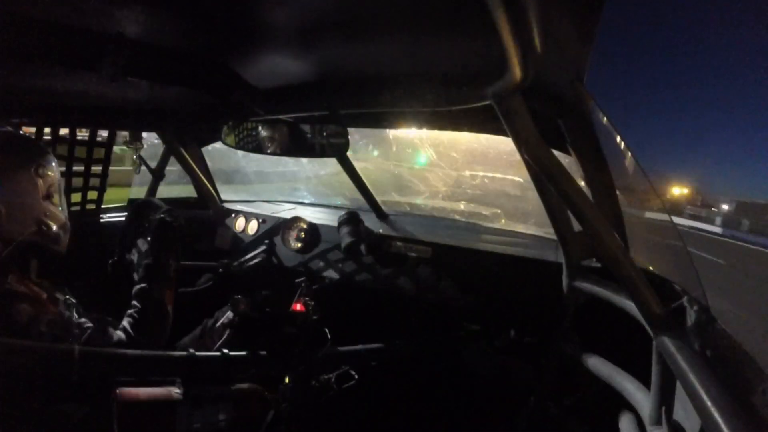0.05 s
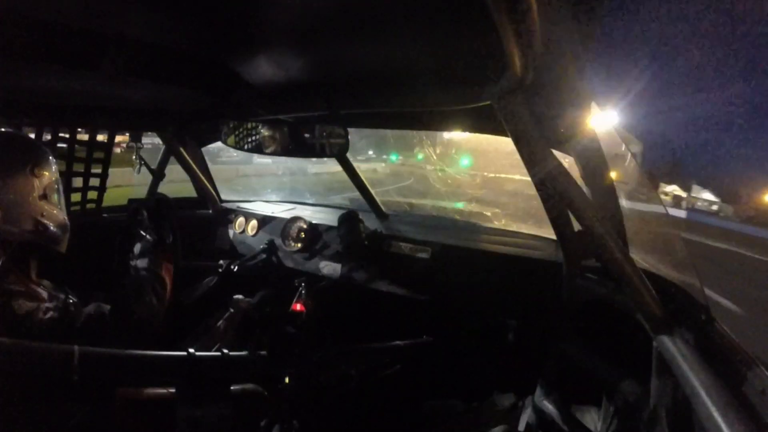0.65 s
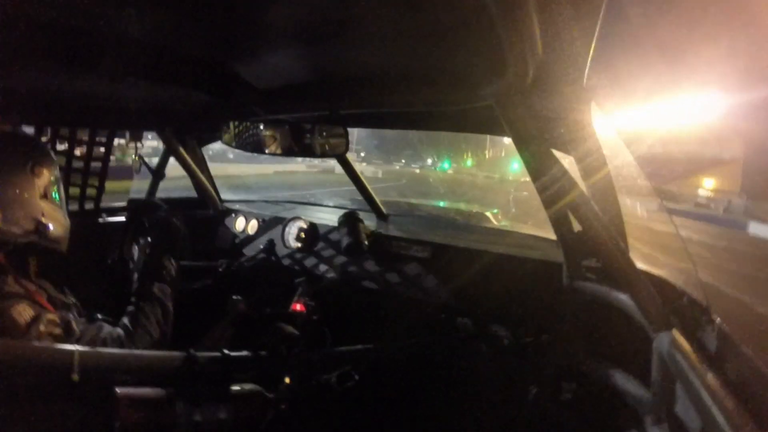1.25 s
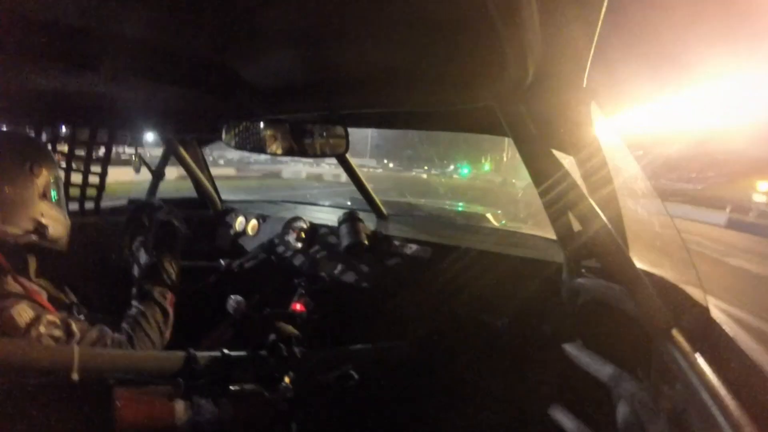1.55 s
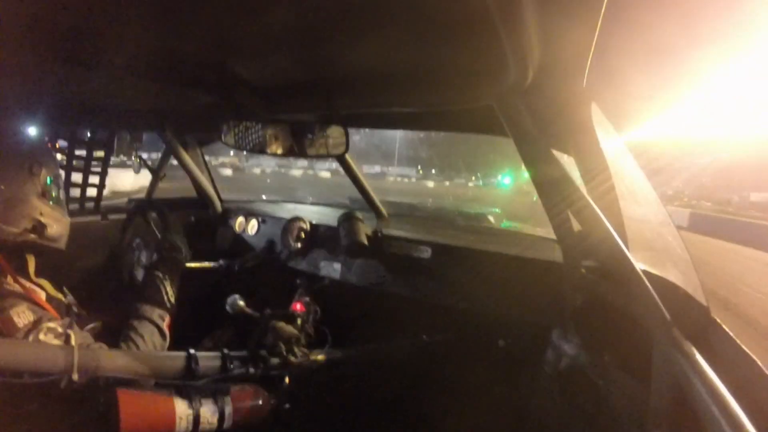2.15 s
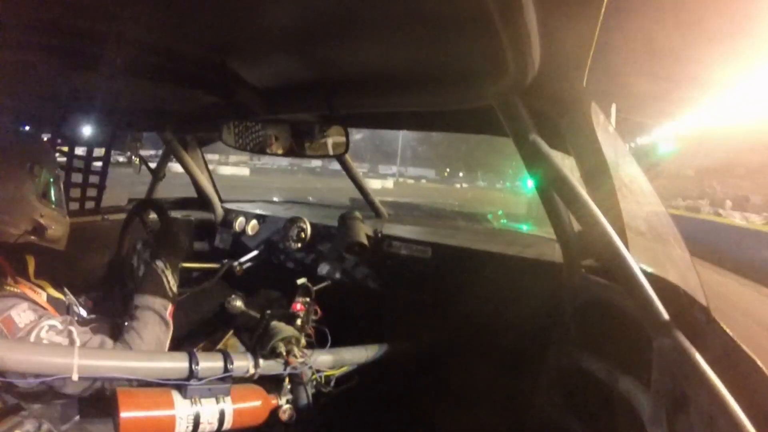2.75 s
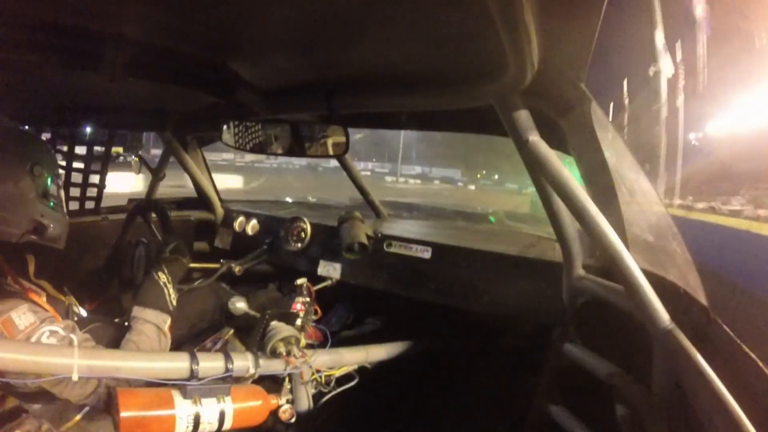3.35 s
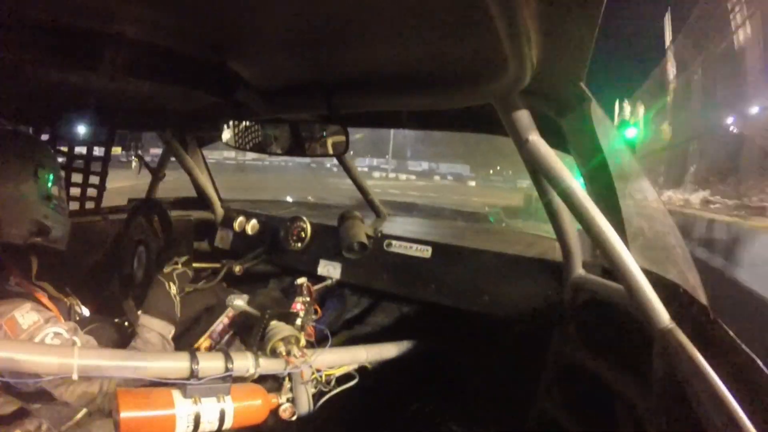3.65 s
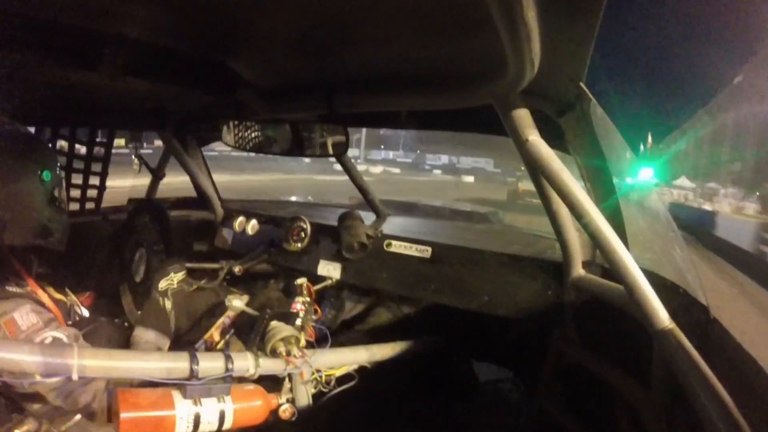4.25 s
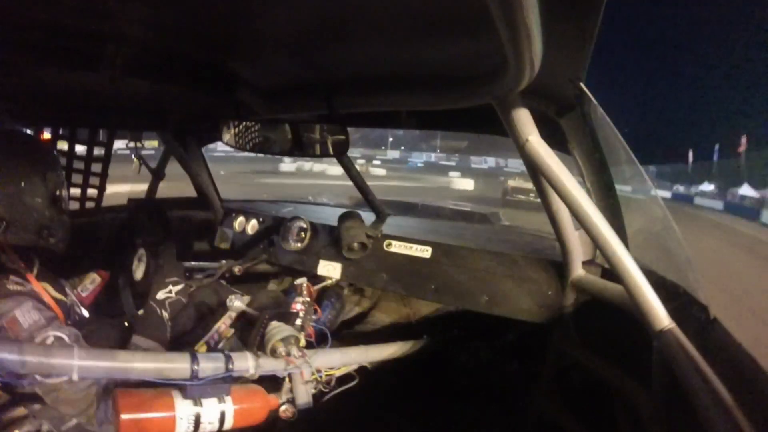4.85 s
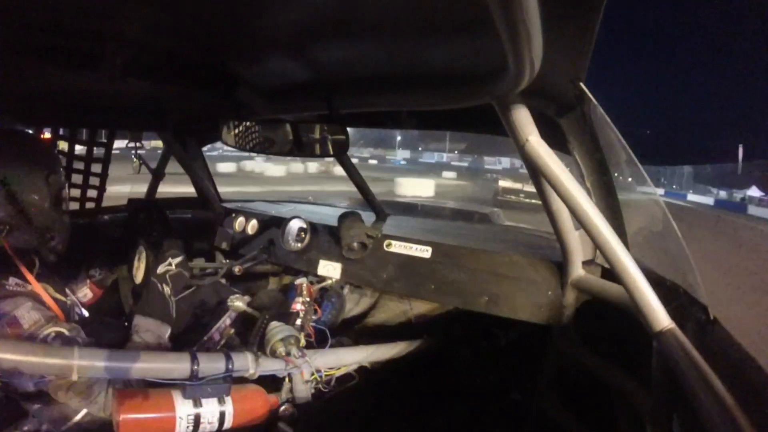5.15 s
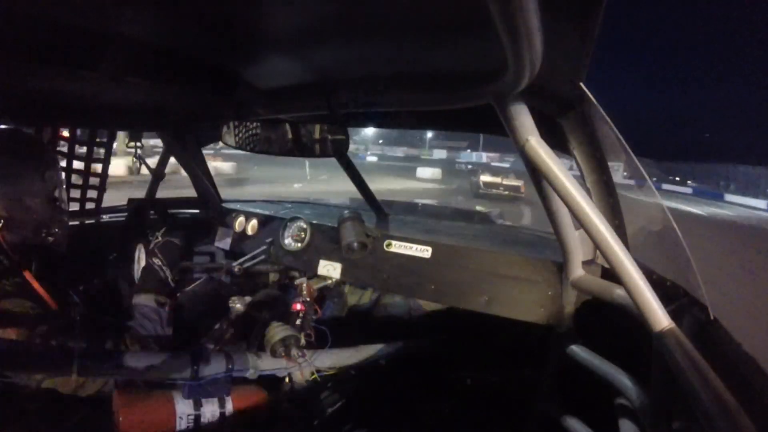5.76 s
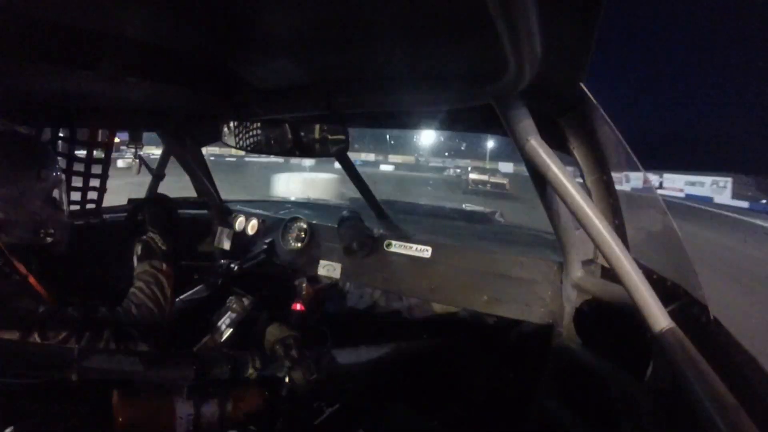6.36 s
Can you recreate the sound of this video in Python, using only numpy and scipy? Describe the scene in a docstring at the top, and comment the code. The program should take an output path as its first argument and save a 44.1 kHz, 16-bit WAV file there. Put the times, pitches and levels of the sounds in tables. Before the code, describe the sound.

Inside a racing car, a loud booming engine pulls along a straight, then eases off while the chassis rumbles and tyres briefly squeal.

```python
"""Bare metal cockpit of a V8 stock car: it pulls along a straight, lifts at 3.6 s and slows into a bend.
Engine orders and gritty road roar pass the shell's resonances; at high revs the second order locks
onto the cabin's air resonance and booms. Fittings ring faintly; a loose panel buzzes at the start.
In the bend the chassis rumble and air drone grow, and the tyres scrub and chirp."""
import sys
import numpy as np
from scipy import signal
from scipy.fft import rfft, irfft, next_fast_len
from scipy.io import wavfile
from scipy.ndimage import uniform_filter1d

SR = 44100
rng = np.random.default_rng(int(sys.argv[2]) if len(sys.argv) > 2 else 0)


def master(y):
    """Save y as 16-bit WAV."""
    cut = np.clip(np.atleast_2d(y).T, -1, 1)
    pcm = np.round(cut * 32767)  # scale
    wavfile.write(sys.argv[1], SR, pcm.astype(np.int16))


N = 291501
HOP = 256
TIME = np.arange(N) / SR
FRAMES = np.arange(N // HOP + 6) * HOP / SR
USUAL_DB = -21  # reference din level

# strong low engine orders: order, pull_db, coast_db
STRONG_ORDERS = [(1, 2.5, 0.5), (2, 2.5, -2), (3, 2, -3), (4, -1, 0.5), (5, -5, -2), (6, -2, 3),
                 (7, -4, -3.5), (8, 8, 4)]


def amp(db):
    """dB to gain."""
    return 10 ** (np.asarray(db) / 20)


def unit(x):
    """Scale to rms 1."""
    return x / np.sqrt(np.mean(x ** 2) + 1e-20)


def ramp(t, start_s, rise_s):
    """Linear rise, 0-1."""
    return np.clip((t - start_s) / rise_s, 0, 1)


def above(x, threshold, width):
    """Soft switch, 0-1."""
    return .5 + .5 * np.tanh((x - threshold) / width / 2)


def log_curve(points, hz):
    """Interpolate on a log-frequency axis."""
    point_hz, value = np.transpose(points)
    return np.interp(np.log(hz + 1), np.log(point_hz + 1), value)


def humps_db(table, hz):
    """Sum of bell-shaped resonances."""
    return sum(db * np.exp(-(2 * (hz - centre) / width) ** 2) for centre, width, db in table)


def spread(x):
    """Frame rate to sample rate."""
    return np.interp(TIME, FRAMES, x)


def wander(rate_hz):
    """Smooth random drift, rms 1, per frame."""
    size = 2 * len(FRAMES)
    lowpass = np.exp(-(np.fft.rfftfreq(size, HOP / SR) / rate_hz) ** 2)
    return unit(irfft(rfft(rng.standard_normal(size)) * lowpass)[:len(FRAMES)])


def noise(gain):
    """Noise with spectrum gain(hz), rms 1."""
    size = next_fast_len(N, real=True)
    spectrum = rfft(rng.standard_normal(size)) * gain(np.fft.rfftfreq(size, 1 / SR))
    return unit(irfft(spectrum, size)[:N])


def steadied(x, window_s):
    """Remove slow swells, keep fast flutter."""
    return x / np.sqrt(uniform_filter1d(x ** 2, max(int(window_s * SR), 64)) + 1e-6)


def rubbed(centre_hz, width_hz):
    """One resonance rung by random rubbing."""
    return noise(lambda hz: 1 / (1 + ((hz - centre_hz) / width_hz) ** 4))


def revs_hz(t):
    """Four-stroke cycle rate; eight firings a cycle."""
    # engine speed: time_s, cycle_hz
    speed = [(0.0, 36.17), (0.72, 38.59), (1.19, 42.12), (1.43, 42.1), (1.85, 45.2), (2.1, 45.8),
             (2.32, 48.67), (2.41, 47.35), (2.96, 49.51), (3.02, 50.32), (3.6, 52.7), (3.8, 47.59),
             (4.4, 44.67), (4.85, 41.1), (5.29, 39.02), (5.43, 38.37), (5.74, 37.3), (6.05, 36.84),
             (6.4, 34.41), (6.61, 34.33)]
    return np.interp(t, *np.transpose(speed))


def throttle(t):
    """1 on the straight, 0 after the lift."""
    return 1 - ramp(t, start_s=3.59, rise_s=0.079)


def by_load(pull, coast):
    """Blend on- and off-throttle values, per frame."""
    return coast + (pull - coast) * throttle(FRAMES)


def bend(t):
    """Cornering load, 0-1: builds from turn-in, eases at the exit."""
    return ramp(t, start_s=4.13, rise_s=1.66) * (1 - ramp(t, start_s=6.48, rise_s=.5))


def dips_db(t, fall_s=0.0055):
    """The level dips briefly."""
    # level dips: start_s, depth_db, recovery_s
    dips = [(0.219, 3, .2), (2.09, 5.5, 0.13), (2.57, 4.5, 0.056), (6.089, 14, 0.069)]
    return -sum(db * ramp(t, start_s, fall_s) * np.exp(-np.maximum(t - start_s, 0) / recovery_s)
                for start_s, db, recovery_s in dips)


def din_db(t, load_db=6):
    """Level of engine and road din, higher on the throttle."""
    # din before throttle and dips: time_s, level_db
    base = [(0.0, -30), (0.12, -27), (0.72, -29.0), (1.1, -25), (1.18, -26.5), (1.28, -24), (1.65, -29.5),
            (2.18, -34.5), (2.45, -31.5), (3.37, -28.5), (3.6, -31), (4.1, -30), (4.4, -23.5),
            (4.88, -18.5), (5.2, -24.5), (5.4, -20.5), (5.56, -24), (5.7, -19), (6.04, -24), (6.34, -22),
            (6.61, -29)]
    return np.interp(t, *np.transpose(base)) + load_db * throttle(t) + dips_db(t)


def shell(hz):
    """Gain into the cockpit: falling slope plus panel resonances."""
    # shell transmission: freq_hz, gain_db
    wall = [(60, -42), (110, 6), (140, 9), (250, -7.5), (400, -7.5), (700, -8), (1050, -14.5), (1700, -13),
            (2080, -21.5), (3000, -19.5), (3700, -20), (4050, -33), (6200, -30.5), (8000, -39.5),
            (13000, -47), (14000, -58.5)]
    # cabin and panel resonances: centre_hz, width_hz, gain_db
    panels = [(309.4, 44, 14), (470, 264, 7.5), (836.5, 91, 13), (927, 95, 10), (1257, 108, 9.5),
              (1438, 64, 12), (1595, 166, 10.5), (1820, 180, 8), (2459, 355, 9), (2776, 134, 7),
              (4524, 710, 7), (5640, 460, 4), (10000, 82, -1)]
    return amp(log_curve(wall, hz) + humps_db(panels, hz))


def din_spectrum(hz, rasp_db=-12, hiss_db=-22.5, rasp_load_db=1.5, mid_revs_hz=43.9, db_per_hz=.14):
    """Din amplitude per root Hz, frames x frequencies; brighter with revs and load."""
    t = FRAMES[:, None]
    bite_db = .12 * throttle(t) * (din_db(t) - USUAL_DB)  # loaded surges turn raspier
    bright_db = db_per_hz * (revs_hz(t) - mid_revs_hz) + bite_db
    body, edge, top = (np.linalg.norm(shell(np.arange(*band_hz)))
                       for band_hz in [(380, 2000), (2000, 4000), (4000, 12000)])
    rasp = amp(rasp_db + rasp_load_db * throttle(t) + bright_db) * body / edge
    hiss = amp(hiss_db + bright_db) * body / top
    upper = log_curve([(1700, 0), (2300, 1)], hz)
    treble = log_curve([(3500, 0), (4500, 1)], hz)
    return amp(din_db(t)) * shell(hz) / body * rasp ** (upper - treble) * hiss ** treble


def pitched_share(hz, sink_hz=36.54, sink_width_hz=0.45):
    """Power share of the orders; they blur into rasp high up and sink into road noise at low revs."""
    fade = log_curve([(300, 1.0), (800, 0.69), (1600, 0.72), (2400, 0.58), (3500, 0.085), (4200, 0.14)],
                     hz)
    share = by_load(pull=0.86, coast=0.72 * above(revs_hz(FRAMES), sink_hz, sink_width_hz))
    return np.clip(share[:, None] * fade, 0, .95)


def crank(jitter=0.00068):
    """Cycle angle in rad; uneven burning makes the speed tremble."""
    tremble = 1 + jitter * spread(wander(rate_hz=22.2))
    return 2 * np.pi * np.cumsum(revs_hz(TIME) * tremble) / SR


def growl_db(hz):
    """The engine drives some resonances harder than others; frames x orders."""
    # driven resonances: centre_hz, width_hz, pull_db, coast_db
    driven = [(352, 35, 4.5, -13), (458, 26, 2, 0.5), (530, 110, -1, -0.5), (686, 270, 0, 0),
              (830, 25, 2, -0.5), (1226, 55, 3, 7.5), (1550, 930, -2, 1.5), (2410, 90, 4, 5)]
    return humps_db([(centre, width, by_load(pull, coast)[:, None])
                     for centre, width, pull, coast in driven], hz)


def exhaust(angle, flutter=0.32, smear_rad=0.21):
    """A comb of fluttering upper orders slides through the shell's resonances."""
    # uneven cylinders favour some order families: pull_db, coast_db
    odd, even, fourth, firing = (2, -5.5), (-1.5, -0.5), (1.5, 0), (3, 0.5)
    cycle_hz = revs_hz(FRAMES)[:, None]
    orders = np.arange(len(STRONG_ORDERS) + 1, 68)
    hz = cycle_hz * orders
    gains = din_spectrum(hz) * np.sqrt(2 * cycle_hz * pitched_share(hz)) * amp(growl_db(hz))
    out = np.zeros(N)
    for order, gain in zip(orders, gains.T):
        family = odd if order % 2 else even if order % 4 else fourth if order % 8 else firing
        gain = gain * amp(by_load(*family)) * (1 + flutter * wander(rate_hz=4.9))
        phase = 2 * np.pi * rng.random() + smear_rad * wander(rate_hz=5.5)
        out += spread(gain) * np.cos(order * angle + spread(phase))
    return out


def roar(angle, patchy_db=1.39, lope=0.081, bank=0.066, puff=0.047):
    """Gas and road noise in the shell, pulsing with the cycle, crank turn and firings."""
    hz = np.fft.rfftfreq(4 * HOP, 1 / SR)
    window = dict(nperseg=4 * HOP, noverlap=3 * HOP)
    white = signal.stft(rng.standard_normal(N + 8 * HOP), **window)[2][:, :len(FRAMES)].T
    patches = uniform_filter1d(rng.standard_normal(white.shape), size=9, axis=0)
    patches = unit(uniform_filter1d(patches, size=14, axis=1))
    gain = din_spectrum(hz) * np.sqrt((1 - pitched_share(hz)) * SR / 2) * amp(patchy_db * patches)
    wash = signal.istft((white * gain).T, **window)[1][:N]
    return wash * unit(1 + lope * np.cos(angle) + bank * np.cos(2 * angle) + puff * np.cos(8 * angle))


def lock(lock_hz=42.23, coast_shift_hz=0.39, width_hz=0.24, build_s=0.32):
    """Lock of order 2 onto the cabin air, 0-1 per frame; builds while revs stay high."""
    high = above(revs_hz(FRAMES), lock_hz + coast_shift_hz * (1 - throttle(FRAMES)), width_hz)
    held_s = np.cumsum(high) * HOP / SR
    return high * (1 - np.exp(-held_s / build_s))


def low_orders(angle, base_db=-41.5, flutter=0.16, boom_db=-11, boom_load_db=-0.5, boom_flutter=0.073):
    """Near-pure orders sweep the cabin modes: order 2 booms, order 8 is the firing note."""
    # cabin air resonances: centre_hz, width_hz, gain_db
    modes = [(49.7, 3.5, 14), (73.6, 28, 16.5), (103.75, 25.3, 29.5), (121.6, 7.5, 16), (159.3, 41.3, 14),
             (217, 24, 11.5), (251.4, 8.1, 8.5), (273.3, 6.8, 10), (299.9, 28.8, 14.5), (328.4, 32, 12.5),
             (385.6, 25, 6.5), (418.5, 24, 7)]
    swell_db = 0.58 * (din_db(FRAMES) - USUAL_DB)
    out = np.zeros(N)
    for order, pull_db, coast_db in STRONG_ORDERS:
        mode_db = humps_db(modes, order * revs_hz(FRAMES))
        gain = amp(base_db + mode_db + by_load(pull_db, coast_db) + swell_db)
        gain *= 1 + flutter * wander(rate_hz=7.8)
        if order == 2:
            boom = amp(boom_db + boom_load_db * throttle(FRAMES))
            boom *= 1 + boom_flutter * wander(rate_hz=27)
            gain += lock() * (boom - gain)
        out += spread(gain) * np.cos(order * angle + 2 * np.pi * rng.random())
    return np.sqrt(2) * out


def chassis_rumble(relative_db=-11.5, bend_db=12):
    """The track shakes the chassis, harder in the bend."""
    # rumble spectrum: freq_hz, density_db
    spectrum = [(6, -21), (16, -9), (30, -2), (42, 10), (52, 11), (62, 5), (80, -12), (160, -104.5)]
    gain = amp(din_db(FRAMES) + relative_db + bend_db * bend(FRAMES) ** 2)
    return spread(gain) * steadied(noise(lambda hz: amp(log_curve(spectrum, hz))), window_s=0.24)


def air_drone(base_db=-19.5, bend_db=2.5, locked_db=-9.5):
    """Cabin air drones near 100 Hz; gives way to the boom, grows in the bend."""
    # drone spectrum: freq_hz, density_db
    spectrum = [(40, -45.5), (62, -21), (76, -15.5), (88, 2), (99, 7), (110, -2.5), (125, -26),
                (150, -17.5), (260, -78.5)]
    gain = amp(base_db + bend_db * bend(FRAMES) + locked_db * lock() + dips_db(FRAMES))
    return spread(gain) * steadied(noise(lambda hz: amp(log_curve(spectrum, hz))), window_s=0.074)


def fittings(relative_db=-2, bend_db=5):
    """Shaken metal parts ring faintly, more in the bend."""
    # fitting resonances: centre_hz, width_hz, weight_db
    rings = [(2420, 75, -17), (3659, 14, -31), (4721, 30, -41), (4960, 12, -44), (5599, 30, -44),
             (10555, 50, -48.5)]
    ringing = noise(lambda hz: sum(amp(db) / np.sqrt(width) / (1 + (2 * (hz - centre) / width) ** 2)
                                   for centre, width, db in rings))
    total = np.linalg.norm(amp([db for _, _, db in rings]))
    return ringing * total * amp(relative_db + din_db(TIME) + bend_db * bend(TIME))


def panel_buzz(start_s=0.032, hold_s=0.155, edge_s=0.044, level_db=-25.5):
    """A loose panel whines for a moment."""
    gate = ramp(TIME, start_s, edge_s) - ramp(TIME, start_s + hold_s, edge_s)
    return amp(level_db) * gate * steadied(rubbed(centre_hz=1563, width_hz=45), window_s=.03)


def tyre_scrub(start_s=4.346, level_db=-28, fade_db_per_s=4.5):
    """Tyres bite just after turn-in and scrub less as the car slows."""
    envelope = amp(level_db - fade_db_per_s * (TIME - start_s)) * ramp(TIME, start_s, rise_s=0.21)
    return envelope * rubbed(centre_hz=835, width_hz=103)


def tyre_chirps(waver=0.014, rough=0.48):
    """The tread sticks and slips in short wavering chirps."""
    # tread slips: start_s, length_s, start_hz, end_hz, level_db
    chirps = [(5.27, 0.19, 870, 834, -22), (5.6, 0.065, 870, 830, -44), (5.85, 0.07, 883, 864, -22),
              (5.94, 0.126, 956, 904.6, -28), (6.15, 0.22, 849, 797, -27.5), (6.41, 0.0698, 835, 796, -24),
              (6.48, 0.077, 792, 815, -26.5), (6.53, 0.083, 815, 846.6, -28)]
    drift, grip = spread(wander(rate_hz=29)), spread(wander(rate_hz=28))
    out = np.zeros(N)
    for start_s, length_s, start_hz, end_hz, level_db in chirps:
        at = (TIME > start_s) & (TIME < start_s + length_s)
        progress = (TIME[at] - start_s) / length_s
        hz = (start_hz + (end_hz - start_hz) * progress) * (1 + waver * drift[at])
        envelope = amp(level_db) * np.sqrt(2 * np.sin(np.pi * progress)) * (1 + rough * grip[at])
        out[at] += envelope * np.sin(2 * np.pi * np.cumsum(hz) / SR)
    return out


def scene(surge_db=0.42, bend_surge_db=1.04):
    """Cockpit mix; the din surges at random, most in the bend."""
    angle = crank()
    surge = spread(amp((surge_db + bend_surge_db * bend(FRAMES)) * wander(rate_hz=18)))
    engine = surge * (exhaust(angle) + roar(angle)) + low_orders(angle)
    cabin = chassis_rumble() + air_drone() + fittings() + panel_buzz()
    tyres = tyre_chirps() + tyre_scrub()
    return (engine + cabin + tyres)[None]


def record(dry):
    """Round off the highest peaks, then low-pass."""
    knee, headroom, cutoff_hz = .6, .19, 13900
    over = np.maximum(abs(dry) - knee, 0)
    rounded = dry - np.sign(dry) * (over - headroom * np.tanh(over / headroom))
    lowpass = signal.firwin(511, cutoff_hz, window=("kaiser", 9), fs=SR)
    return signal.oaconvolve(rounded, lowpass[None], "same")


dry = scene()
out = record(dry)
master(out)
```